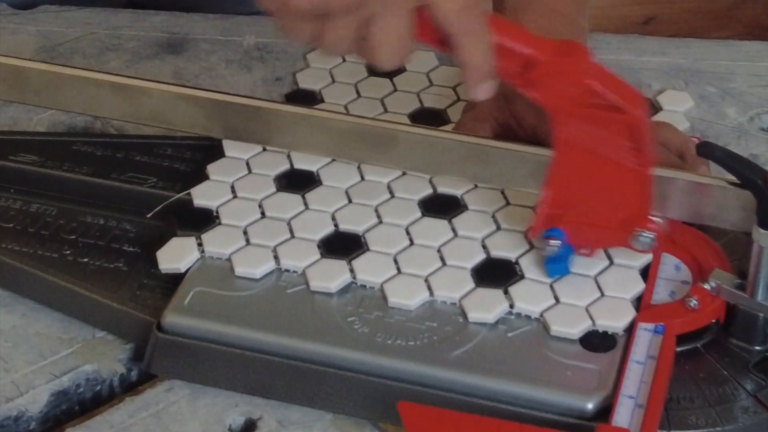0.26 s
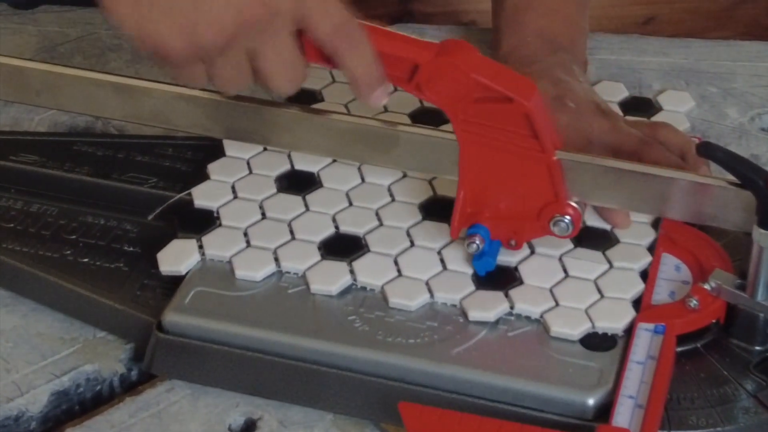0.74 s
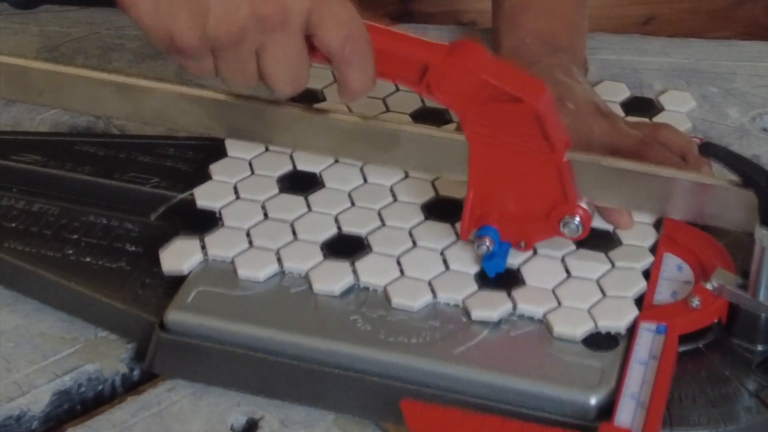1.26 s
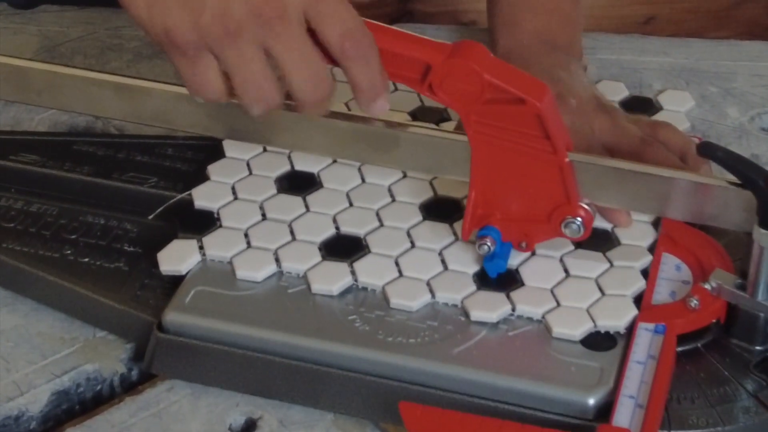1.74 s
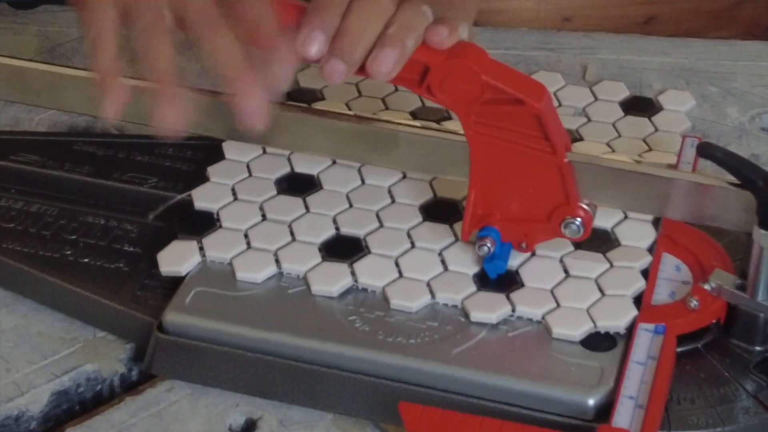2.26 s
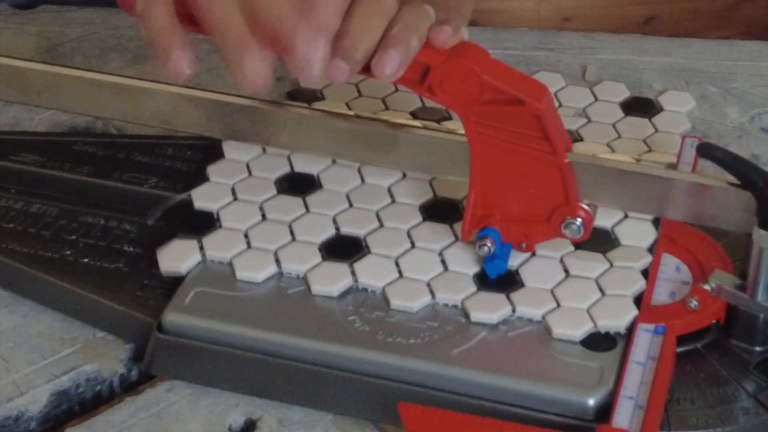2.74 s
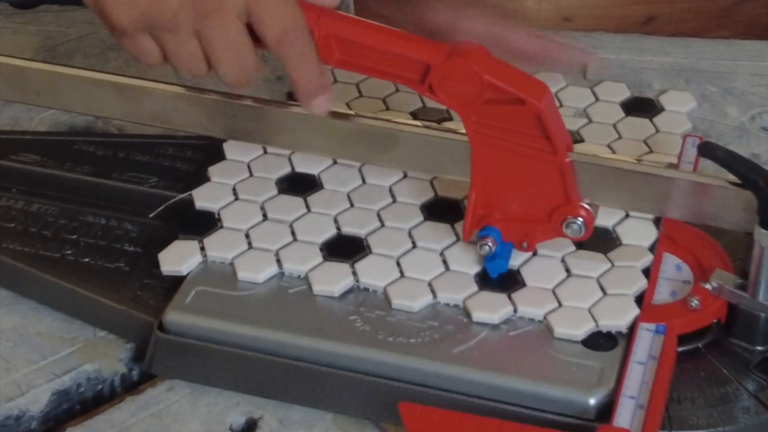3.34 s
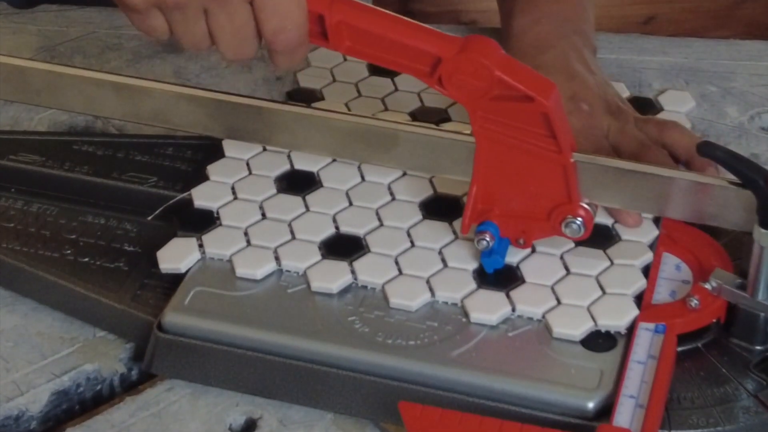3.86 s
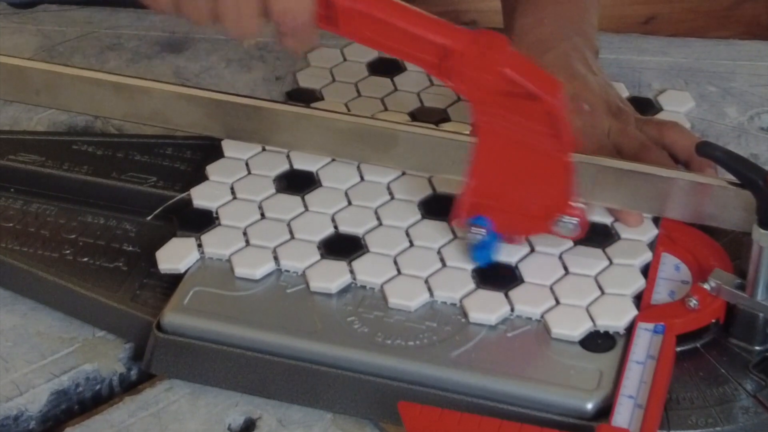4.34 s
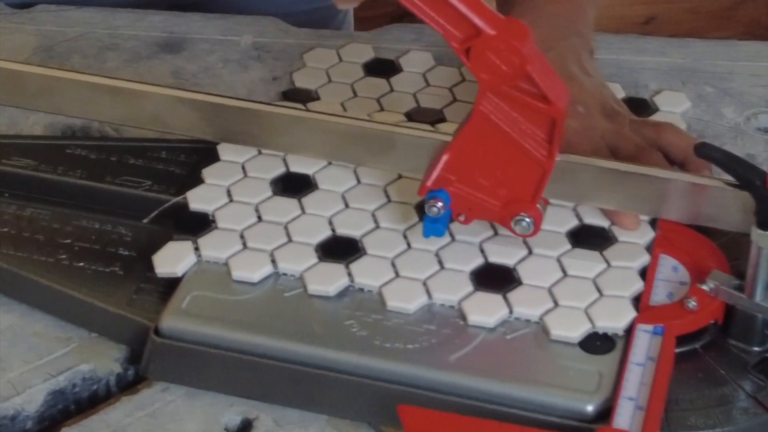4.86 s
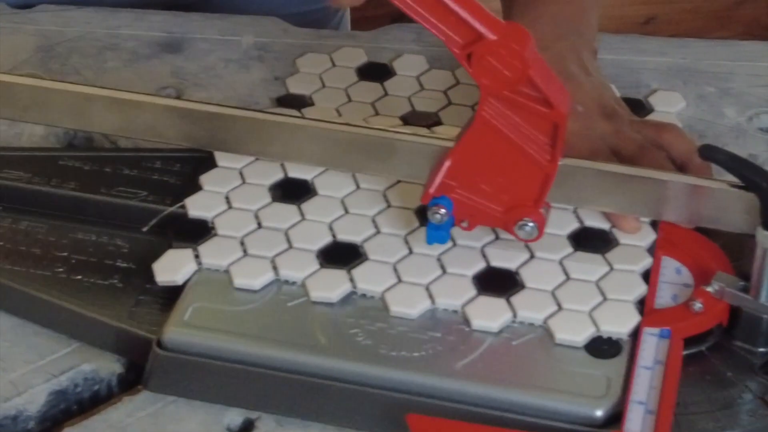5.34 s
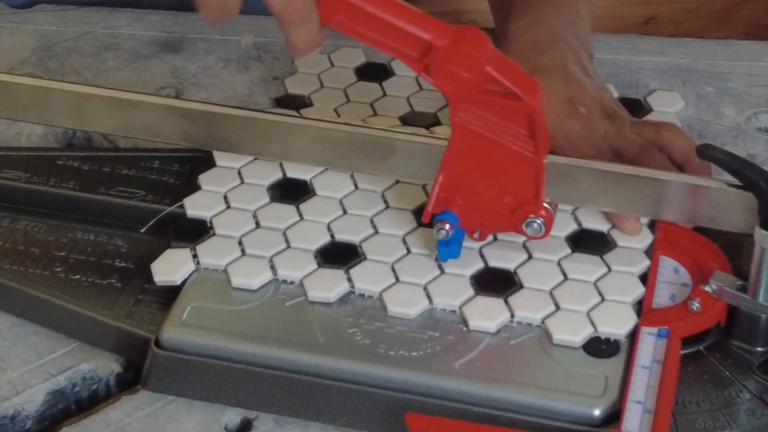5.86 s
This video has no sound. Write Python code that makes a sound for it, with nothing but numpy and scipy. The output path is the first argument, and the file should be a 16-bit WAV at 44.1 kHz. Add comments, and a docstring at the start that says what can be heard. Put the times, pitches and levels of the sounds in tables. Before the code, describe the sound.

Close in a bare, lightly echoing room, a tile cutter's carriage rubs along its rail, then the wheel drops through three hard, gritty clacks. Five palm strikes follow, growing louder and closer together, with bouncing knocks, low floor thumps and chattering tiles. A faint palm squeak and pause lead to short scrapes, a sharp lever snap, small clicks, another heavy double clack, and a last faint scrape.

```python
"""A palm strikes the handle of a manual tile cutter five times; the cutter bounces and its loose tiles chatter.
Before that the carriage slides and the wheel crunches from tile to tile; later the lever snaps back and down.
Hits are damped noise bursts plus decaying sines; the floor is a set of low decaying sines.
Chatter, crunch and rubbing are trains of tiny random impacts driving resonances.
A bare room adds filtered-noise echoes over quiet coloured noise."""
import sys
import numpy as np
from scipy import signal
from scipy.fft import rfft, irfft, next_fast_len
from scipy.io import wavfile
from scipy.ndimage import uniform_filter1d, minimum_filter1d

SR = 44100
rng = np.random.default_rng(int(sys.argv[2]) if len(sys.argv) > 2 else 0)


def pcm_store(signal):
    """Save signal as 16-bit PCM."""
    levels = np.round(np.clip(np.atleast_2d(signal), -1, 1) * 32767)
    wavfile.write(sys.argv[1], SR, levels.astype(np.int16).T)


N = 269010
TIME = np.arange(N) / SR
RING_TIME = TIME[:SR]


def from_db(db):
    """Decibels to amplitude gain."""
    return 10 ** (np.asarray(db) / 20)


def rms_one(x):
    """Scale to unit rms."""
    return x / np.sqrt(np.mean(x ** 2) + 1e-20)


def peak_one(x):
    """Scale to unit peak."""
    return x / (np.abs(x).max() + 1e-20)


def at_hz(points, hz):
    """Interpolate a table on a log-frequency axis."""
    f, value = np.transpose(points)
    return np.interp(np.log(hz + 1e-9), np.log(f), value)


def add(track, s, sound):
    """Mix a sound into a track at a time."""
    start = int(np.clip(round(s * SR), 0, N - 1))
    track[start:start + len(sound)] += sound[:N - start]


def fade(t60_s):
    """Exponential decay, cut after one second."""
    return np.exp(-np.log(1000) * RING_TIME / max(t60_s, 1e-3))


def coloured(x, colour):
    """Shape the spectrum of a steady signal; rms 1."""
    size = next_fast_len(len(x))
    gain = from_db(at_hz(colour, np.fft.rfftfreq(size, 1 / SR)))
    return rms_one(irfft(rfft(x, size) * gain, size)[:len(x)])


def burst(colour, t60_s, contact_s):
    """Many crowded, damped modes: coloured noise that builds up during contact and dies away."""
    size = SR // 4
    shape = (fade(t60_s) * (1 - np.exp(-(RING_TIME / contact_s) ** 2)))[:size]
    hit = coloured(rng.standard_normal(size), colour) * shape
    level = .5 * np.sqrt(np.mean(shape ** 2))
    return np.pad(level * rms_one(hit), (0, SR - size))


def ring(modes, spread_db):
    """Decaying sines; each call draws new mode signs and level offsets."""
    out = 0
    for hz, db, t60_s in modes:
        gain = from_db(db + spread_db * rng.standard_normal()) * rng.choice([-1, 1])
        out = out + gain * fade(t60_s) * np.sin(2 * np.pi * hz * RING_TIME)
    return out


def grains(per_s, spread_db):
    """Random tiny impacts of uneven size."""
    sizes = from_db(spread_db * np.minimum(rng.exponential(1, N), 4)) * rng.choice([-1, 1], N)
    return sizes * (rng.random(N) < per_s / SR)


def excite(force, response):
    """Drive a body with a force; unit-energy response keeps the power of a noisy force."""
    return signal.fftconvolve(force, response / np.linalg.norm(response))[:N]


STROKE_PEAK, STROKE_CURVE = 0.61, 0.77  # fastest at this share of length; exponent of the swell


def swell(s, length_s, peak=STROKE_PEAK):
    """A push gathers speed, peaks and stops."""
    ramp = np.interp((TIME - s) / length_s, [0, np.clip(peak, .05, .95), 1], [0, 1, 0])
    return ramp ** STROKE_CURVE


# bed clack spectrum: [f/Hz, relative level/dB per Hz]
KNOCK_COLOUR = [(250, -17.5), (450, -14), (620, -5.5), (780, 3.5), (950, -5.5), (1250, -12.5),
                (1700, -18.5), (3000, -27), (6000, -81.5)]
# hollow body-note spectrum: [f/Hz, relative level/dB per Hz]
HOLLOW_COLOUR = [(50, -14), (120, 4), (200, -0.5), (300, 1.5), (450, -2.5), (700, -36), (2000, -63.5)]
# frame and bed modes: [f/Hz, relative level/dB, t60/s]
BED_MODES = [(306.3, -2, 0.068), (349.3, -2.5, 0.13), (377, -19.5, 0.051), (551, -13, 0.19),
             (577.7, -9.5, 0.11), (676, 5.5, 0.053), (717, -1.5, 0.14), (759, -3.5, 0.13),
             (794.5, -3, 0.19), (855.6, -5.5, 0.25), (919.7, -8.5, 0.2), (963.4, -11, 0.1),
             (1152, -14.5, 0.53), (1300, -16, 0.24), (1473, -12, 0.12)]
BED_SHARE_DB = -7  # frame, relative to the knock level


def knock(db, hollow_db):
    """Something hits the bed: a short clack, a hollow body note and the ringing frame."""
    clack = burst(KNOCK_COLOUR, t60_s=.034, contact_s=.0006)
    hollow = burst(HOLLOW_COLOUR, t60_s=.12, contact_s=.0008)
    frame = peak_one(ring(BED_MODES, spread_db=2))
    mix = from_db(0.36) * clack + from_db(hollow_db + 0.5) * hollow + from_db(BED_SHARE_DB) * frame
    return from_db(db) * mix


# crack spectrum: [f/Hz, relative level/dB per Hz]
CLICK_COLOUR = [(400, -25), (1000, 4), (1600, -4), (2400, 4.5), (3300, -3), (4800, -8), (7000, -21.5),
                (14000, -63.5)]
# treble spectrum of a crack: [f/Hz, relative level/dB per Hz]
TREBLE_COLOUR = [(1500, -43), (3500, -13), (5200, -5), (6200, 2.5), (8000, -1.5), (10000, -10.5),
                 (12500, -19), (16000, -23.5)]
# modes of the carriage's metal parts: [f/Hz, relative level/dB, t60/s]
METAL_MODES = [(1875, 8, 0.13), (2207, 4, 0.14), (2310, -9.5, 0.11), (2623, 7.5, 0.028),
               (2670, -11.5, 0.13), (3120, 2.5, 0.05), (3500, -11, 0.079), (3640, 1, 0.026),
               (3890, -16, 0.6), (5380, -1, 0.077), (7400, -26, .1)]


def click(db, treble_db):
    """A hard contact of steel or ceramic: a crack with its own brightness, and a metal ring."""
    crack = burst(CLICK_COLOUR, t60_s=0.049, contact_s=0.00058)
    treble = burst(TREBLE_COLOUR, t60_s=0.061, contact_s=0.00083)
    metal = peak_one(ring(METAL_MODES, spread_db=2.5))
    return from_db(db) * (crack + from_db(treble_db) * treble + from_db(-11.5) * metal)


# floor sway modes under the cutter: [f/Hz, relative level/dB, t60/s]
FLOOR_MODES = [(28.24, 0, 0.24), (35.1, -8.5, 0.82), (57.6, 2.5, 0.24), (73.8, -4, 0.22), (101, -6, 0.19),
               (154.4, -10.5, 0.14)]


def thump(db, hardness_db_per_oct, push_s=0.023):
    """The floor gives way under a blow and sways on; hardness tilts its modes toward the higher ones."""
    modes = []
    for hz, mode_db, t60_s in FLOOR_MODES:
        # each thump draws its mode frequencies about 4 % apart, so the sway beats irregularly
        drawn_hz = hz * rng.normal(1, .04)
        modes.append((drawn_hz, mode_db + hardness_db_per_oct * np.log2(hz), t60_s))
    sway = ring(modes, spread_db=1)
    return from_db(db) * peak_one(sway * (1 - np.exp(-RING_TIME / push_s)))


def shaking(db, lasts_s=0.091):
    """How hard the bed shakes the loose tiles after a blow: a half-Gaussian envelope."""
    return from_db(db) * np.exp(-(RING_TIME / lasts_s) ** 2)


# palm strikes: [t/s, knock level/dB, crack level/dB, floor level/dB]
BLOWS = [(2.2901, -7.5, -23, -20), (2.5204, -4, -17, -13.5), (2.7215, -2.5, -6.5, -9.5),
         (2.9169, -0.5, -5.5, -8.5), (3.0707, -1.5, -8, -6)]
# knocks of every blow, its own first and then its bounces: [delay/s, knock level/dB, click level/dB], levels
# relative to the blow's knock
BLOW_KNOCKS = [(0.001, -8, -31), (0.0117, -1.5, -16), (0.031, 0.5, -22), (0.0713, -7.5, -23.5)]
BLOW_HOLLOW_DB, BLOW_TREBLE_DB = -25.5, -10.5
BLOW_FLOOR_LAG_S, BLOW_HARDNESS_DB_PER_OCT = 0.0077, -0.4
BLOW_CHATTER_DB = -13.5  # relative to the floor


def blows():
    """Each palm blow cracks the wheel onto the tile; the cutter bounces and the floor sways."""
    dull, bright, floor, shake = tracks = np.zeros((4, N))
    for s, db, crack_db, floor_db in BLOWS:
        add(bright, s, click(crack_db, BLOW_TREBLE_DB))
        for delay_s, knock_db, click_db in BLOW_KNOCKS:
            add(dull, s + delay_s, knock(db + knock_db, BLOW_HOLLOW_DB))
            add(bright, s + delay_s, click(db + click_db, BLOW_TREBLE_DB))
        add(floor, s + BLOW_FLOOR_LAG_S, thump(floor_db, BLOW_HARDNESS_DB_PER_OCT))
        add(shake, s + BLOW_FLOOR_LAG_S, shaking(floor_db + BLOW_CHATTER_DB))
    return tracks


# wheel set down, three joint drops, lever back, lever down:
# [t/s, knock level/dB, crack level/dB, hollow share/dB, rebound delay/s, rebound level/dB,
#  floor lag/s, floor level/dB, hardness/dB per octave, chatter level/dB]
JOLTS = [(0.7704, -24.5, -26.5, -5, .02, -32, 0.012, -24, -8, -72),
         (1.111, -0.5, -4, -11, 0.036, -5.5, 0.019, -20.5, -5.5, -36),
         (1.312, -4, -23, -22, .018, 0, -0.018, -17, 7.5, -36),
         (1.506, 4, -11.5, -27, .02, 1, -.011, -5.5, -2, -25.5),
         (4.6624, -4.5, -1, -6.5, .007, -0.5, -0.0045, -18, -17, -32.5),
         (5.2616, 4, -23, -9, .0095, 7, -0.008, -11, 3, -21)]
JOLT_TREBLE_DB = -13
REBOUND_HOLLOW_DB, REBOUND_CLICK_DB = -28.5, -13.5  # relative to the rebound's knock
REBOUND_SHRINK, REBOUND_LOSS_DB = .75, 11  # second rebound: shorter gap, weaker


def jolts():
    """Wheel or lever lands hard, rebounds twice and shakes the floor."""
    dull, bright, floor, shake = tracks = np.zeros((4, N))
    for (s, db, crack_db, hollow_db, rebound_s, rebound_db,
         lag_s, floor_db, hardness_db_per_oct, chatter_db) in JOLTS:
        add(dull, s, knock(db, hollow_db))
        add(bright, s, click(crack_db, JOLT_TREBLE_DB))
        for k in range(2):
            at_s = s + rebound_s * (1 + k * REBOUND_SHRINK)
            level_db = rebound_db - k * REBOUND_LOSS_DB
            add(dull, at_s, knock(level_db, REBOUND_HOLLOW_DB))
            add(bright, at_s, click(level_db + REBOUND_CLICK_DB, JOLT_TREBLE_DB))
        add(floor, s + lag_s, thump(floor_db, hardness_db_per_oct))
        add(shake, s + lag_s, shaking(chatter_db))
    return tracks


# light taps of wheel, lever and loose tiles: [t/s, knock level/dB, click level/dB, treble share/dB]
TAPS = [(0.0402, -17.5, -25.5, -12.5), (0.384, -17.5, -26.5, -20), (0.5128, -19.5, -25.5, -7),
        (0.992, -18, -20.5, -7), (1.016, -29, -25.5, -28), (1.059, -24.5, -26, -24),
        (1.2217, -24.5, -19.5, -7.5), (1.4245, -21.5, -18, -10), (1.465, -8.5, -18.5, -12),
        (2.023, -23, -30.5, -8.5), (3.251, -22, -33.5, -13), (3.746, -36, -50, -11),
        (4.234, -25.5, -26.5, -15), (4.3695, -30, -19, -11), (4.4477, -24.5, -24, -16),
        (4.769, -10.5, -44.5, -17), (4.833, -20.5, -37.5, -14), (4.9473, -16, -27, -24),
        (4.968, -21.5, -35.5, -2), (5.033, -12, -38, -18), (5.046, -27, -23, -25),
        (5.0597, -14.5, -30.5, -4.5), (5.136, -21, -39, -18), (5.17, -21, -48, -21.5),
        (5.408, -21, -47.5, -22), (5.466, -24, -44, -22), (5.509, -20, -24, -34), (6.072, -35, -32, -28)]
TAP_HOLLOW_DB, HOLLOW_DB_PER_CLICK_DB = -22, -.45  # the clickier a tap, the less body note


def taps():
    """Light contacts knock, click and ring, but leave the floor still."""
    dull, bright, _, _ = tracks = np.zeros((4, N))
    for s, db, click_db, treble_db in TAPS:
        hollow_db = TAP_HOLLOW_DB + HOLLOW_DB_PER_CLICK_DB * (click_db - db)
        add(dull, s, knock(db, hollow_db))
        add(bright, s, click(click_db, treble_db))
    return tracks


# rail notes, at the start and on the first tap: [t/s, f/Hz, level/dB, t60/s]
RAIL_NOTES = [(0.0, 1476, -57, 1.3), (0.041, 1067, -20, 0.065)]
# small steel parts rung by the last snap: [f/Hz, level/dB, t60/s]
SNAP_MODES = [(3160, -24.5, 0.12), (3700, -25.5, 0.11), (4660, -43, 0.15), (6440, -34.5, 0.3),
              (8340, -29, .14)]
SNAP_RING_S = 5.278


def ringing():
    """The rail and small steel parts ring on as decaying sines."""
    out = np.zeros(N)
    for s, hz, db, t60_s in RAIL_NOTES:
        add(out, s, ring([(hz, db, t60_s)], spread_db=0))
    add(out, SNAP_RING_S, ring(SNAP_MODES, spread_db=0))
    return out


# gritty clack spectrum: [f/Hz, relative level/dB per Hz]
GRIT_COLOUR = [(100, -25), (350, 7), (800, 11), (1500, 2), (2800, -4), (4500, -6.5), (8000, -16.5),
               (11000, -26), (16000, -53)]


def rattle(level, per_s, ring_db):
    """Uneven tiny impacts in three summed layers, each with its own random clack and metal response."""
    out = 0
    for _ in range(3):
        ticks = level * rms_one(grains(per_s, spread_db=4)) / np.sqrt(3)
        out = out + excite(ticks, burst(GRIT_COLOUR, t60_s=.028, contact_s=.0003))
        out = out + from_db(ring_db) * excite(ticks, ring(METAL_MODES, spread_db=0.5))
    return out


# faint settling ticks: [t/s, length/s, level/dB]
SETTLING = [(3.207, 0.53, -52.5), (5.343, .45, -56.5)]


def chatter(shake):
    """Loose tiles rattle while the bed shakes, then settle with a few ticks."""
    settling = sum(from_db(db) * (TIME > s) * (TIME < s + length_s) for s, length_s, db in SETTLING)
    return rattle(shake, per_s=180, ring_db=-15.5) + rattle(settling, per_s=14, ring_db=-31)


# wheel pressure on glaze and grit: [t/s, length/s, crunch level/dB]
SCORES = [(0.958, 0.24, -39.5), (1.259, 0.075, -26), (1.325, 0.26, -38.5), (1.468, 0.12, -23.5),
          (4.947, 0.35, -45)]
# splintering glaze spectrum: [f/Hz, relative level/dB per Hz]
FIZZ_COLOUR = [(1500, -22), (4500, -21), (9000, 14), (16000, 2)]
GRUMBLE_DB, FIZZ_DB = -3.5, -23.5  # relative to the crunch


def wheel():
    """Glaze and grit crumble under the wheel: a crunch, a fine fizz and a grumble in the bed."""
    pressure = sum(from_db(db) * swell(s, length_s) for s, length_s, db in SCORES)
    chips = pressure * rms_one(grains(per_s=1500, spread_db=7))
    crunch = rattle(pressure, per_s=400, ring_db=-32)
    grumble = excite(chips, burst(HOLLOW_COLOUR, t60_s=.05, contact_s=.0008))
    fizz = excite(chips, burst(FIZZ_COLOUR, t60_s=.01, contact_s=.0002))
    return crunch + from_db(GRUMBLE_DB) * grumble + from_db(FIZZ_DB) * fizz


# binding carriage: [t/s, length/s, drag level/dB]
BINDS = [(4.301, 0.14, -32), (6.067, .1, -38.5)]
BITE_DB, BITE_S, BIND_RELEASE_S = 12, 0.011, 0.0078


def binding():
    """Friction while the carriage binds: a hard bite, a steady drag, a quick release."""
    force = np.zeros(N)
    for s, length_s, db in BINDS:
        bite = 1 + from_db(BITE_DB) * np.exp(-RING_TIME / BITE_S)
        release = np.exp(-np.maximum(RING_TIME - length_s, 0) / BIND_RELEASE_S)
        add(force, s, from_db(db) * bite * release)
    return force


# rubbed-rail resonances: [f/Hz, bandwidth/Hz, relative level/dB]
RAIL = [(330, 59, -7.5), (700, 140, -2), (940, 81, -0.5), (1174, 29, 1.5), (1477, 46, -8),
        (1970, 140, -6.5), (2157, 110, -9.5), (2520, 26, -13.5), (3530, 91, -23)]


def rail_resonances(slips):
    """Broad rail modes as parallel two-pole filters of alternating sign; rms 1."""
    rail = 0
    for k, (hz, width_hz, db) in enumerate(RAIL):
        r = np.exp(-np.pi * width_hz / SR)
        poles = [1, -2 * r * np.cos(2 * np.pi * hz / SR), r * r]
        band = signal.lfilter([1, 0, -1], poles, slips)
        rail = rail + (-1) ** k * from_db(db) * (1 - r * r) * band
    return rms_one(rail)


# carriage pushes: [t/s, length/s, push level/dB, hiss share/dB]
STROKES = [(0.282, .105, -29.5, -19), (0.468, 0.17, -21.5, -13.5), (3.949, 0.13, -27.5, -23),
           (4.299, 0.18, -26, -14), (5.988, 0.22, -30.5, -20)]
# dry hiss spectrum: [f/Hz, relative level/dB per Hz]
HISS_COLOUR = [(200, -12), (1000, 2.5), (2200, 10), (3500, 7.5), (5500, -5.5), (9000, -4), (11000, -32.5),
               (16000, -32.5)]
# sharply tuned rail bending modes: [f/Hz, relative level/dB, t60/s]
SQUEAL_MODES = [(683, -6, 0.16), (865, 9.5, 0.059), (1119, 5, 0.25), (1554, -6.5, 0.33), (2160, -4, 0.12),
                (2590, -20, 0.081), (3160, -11.5, 0.087), (3530, -16.5, 0.126)]
BIND_RUB_DB, STROKE_SING_DB = -6.5, -7.5  # rubbing added by binding; singing added by rubbing


def carriage():
    """Dense little slips excite the rail's broad resonances, its singing modes and a dry hiss."""
    slips = rms_one(grains(per_s=2500, spread_db=4.0))
    drag = binding()
    rubbing, hissing = from_db(BIND_RUB_DB) * drag, 0
    for s, length_s, db, hiss_db in STROKES:
        push = from_db(db) * swell(s, length_s)
        rubbing = rubbing + push
        hissing = hissing + from_db(hiss_db) * push
    rub = from_db(-4.5) * rubbing * rail_resonances(slips)
    hiss = hissing * coloured(slips, HISS_COLOUR)
    singing = drag + from_db(STROKE_SING_DB) * rubbing
    squeal = excite(singing * slips, ring(SQUEAL_MODES, spread_db=0))
    return rub + hiss + squeal


# palm slides along the plastic handle: [t/s, length/s, rubbing level/dB]
PALM_SLIDES = [(3.298, 0.13, -37), (3.506, 0.17, -55)]
# rubbing-skin spectrum: [f/Hz, relative level/dB per Hz]
PALM_COLOUR = [(500, 15), (1600, 2), (1900, -2), (2200, 5), (3500, -6), (12000, -36)]
SQUEAK_HZ, SQUEAK_T60_S, SQUEAK_DB = 1890, .035, -4  # handle resonance


def palm():
    """Skin sticks and slips on the handle and sets it squeaking."""
    slide = sum(from_db(db) * swell(s, length_s, peak=0.14) for s, length_s, db in PALM_SLIDES)
    slips = slide * rms_one(grains(per_s=1500, spread_db=3))
    rub = excite(slips, burst(PALM_COLOUR, t60_s=.02, contact_s=.0003))
    squeak = excite(slips, fade(SQUEAK_T60_S) * np.sin(2 * np.pi * SQUEAK_HZ * RING_TIME))
    return rub + from_db(SQUEAK_DB) * squeak


SOFT_THUD_S = 2.9


def soft_thud():
    """A soft low thud just before the fourth blow: floor sway plus a hollow noise burst."""
    out = np.zeros(N)
    body = burst(HOLLOW_COLOUR, t60_s=0.094, contact_s=0.0023)
    add(out, SOFT_THUD_S, thump(db=-20.5, hardness_db_per_oct=5.9) + from_db(-27) * body)
    return out


# room decay: [f/Hz, t60/s]
ROOM_T60 = [(150, 0.49), (500, 0.33), (1200, 0.44), (3000, 0.38), (7000, 0.37), (14000, 0.34)]


def room(x, first_echo_s=0.0037, build_s=0.0016):
    """Diffuse echoes off bare walls: noise bands, each dying at its own rate."""
    edges_hz, tail = np.geomspace(90, 18000, num=9), 0
    for low, high in zip(edges_hz, edges_hz[1:]):
        sos = signal.butter(2, [low, high], "band", fs=SR, output="sos")
        band = signal.sosfilt(sos, rng.standard_normal(SR))
        tail = tail + band * fade(at_hz(ROOM_T60, np.sqrt(low * high)))
    tail = tail * (1 - np.exp(-np.maximum(RING_TIME - first_echo_s, 0) / build_s))
    return excite(x, tail)


# room-quiet spectrum: [f/Hz, relative level/dB per Hz]
AMBIENCE = [(12, -6.5), (20, 0), (41, -7.5), (98, -24), (215, -27.5), (255, -27.5), (356, -22), (387, -33),
            (677, -29), (15900, -58)]
AMBIENCE_DB = -45.5


def quiet_room():
    """Steady coloured noise stands for the quiet of the room."""
    return from_db(AMBIENCE_DB) * coloured(rng.standard_normal(N), AMBIENCE)


def scene():
    """The cutter, its echoes and the quiet of the room."""
    dull, bright, floor, shake = blows() + jolts() + taps()
    bright = bright + ringing()
    soft = chatter(shake) + wheel() + carriage() + palm() + soft_thud()
    echoes = room(from_db(-11.0) * dull + from_db(-8.5) * bright + from_db(-14.0) * soft)
    return (dull + bright + soft + floor + echoes + quiet_room())[None]


CUTOFF_HZ = 15900


def record(dry):
    """A very fast limiter holds peaks at full scale; a steep low-pass then cuts the top."""
    needed_gain = 1 / np.maximum(np.abs(dry), 1)
    gain = uniform_filter1d(minimum_filter1d(needed_gain, size=11), size=11)
    low_pass = signal.ellip(10, .1, 70, CUTOFF_HZ, fs=SR, output="sos")
    return signal.sosfilt(low_pass, dry * gain)


dry = scene()
out = record(dry)
pcm_store(out)
```